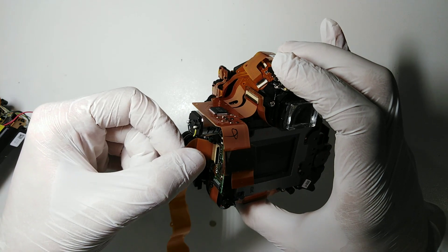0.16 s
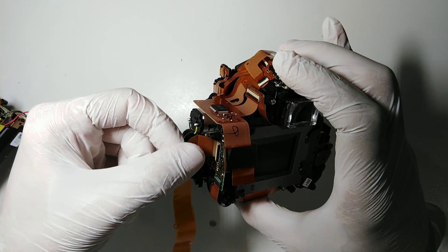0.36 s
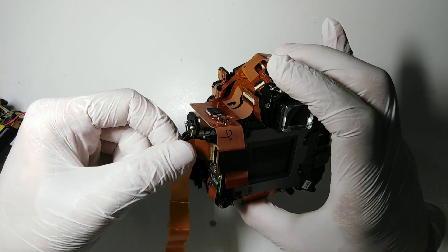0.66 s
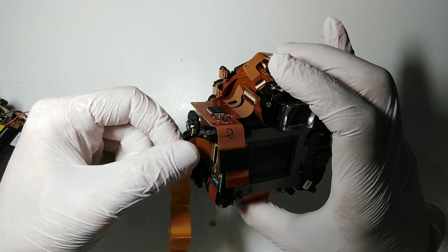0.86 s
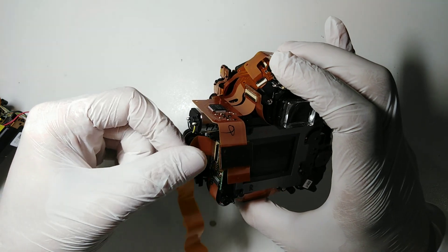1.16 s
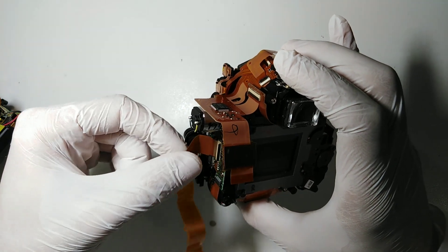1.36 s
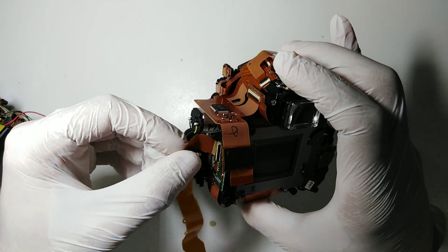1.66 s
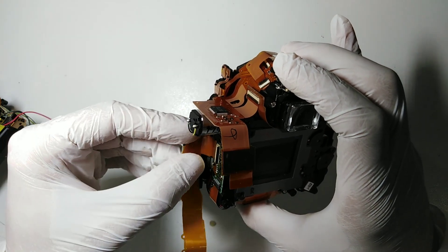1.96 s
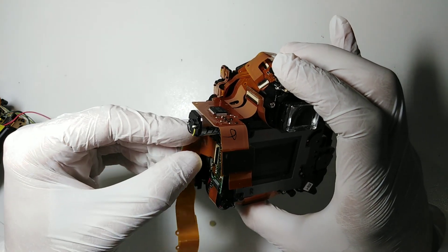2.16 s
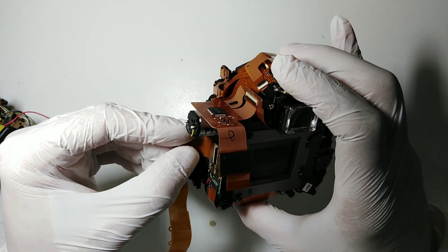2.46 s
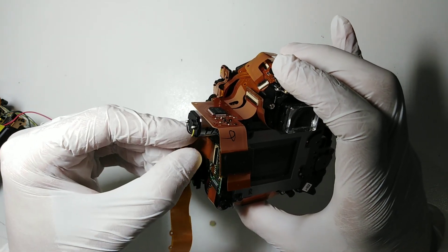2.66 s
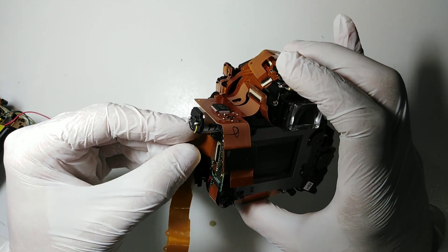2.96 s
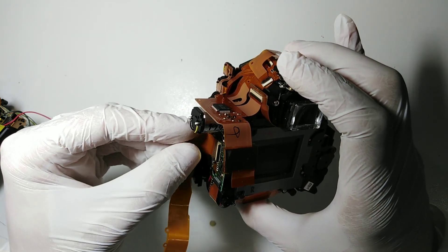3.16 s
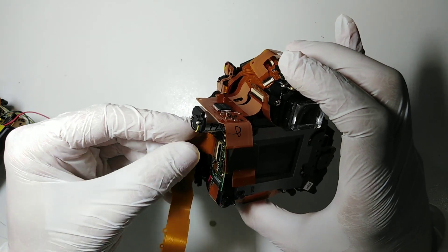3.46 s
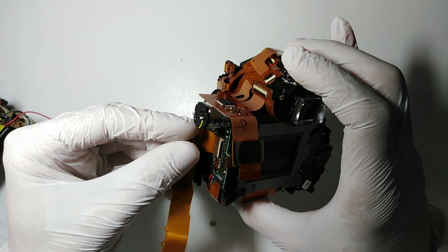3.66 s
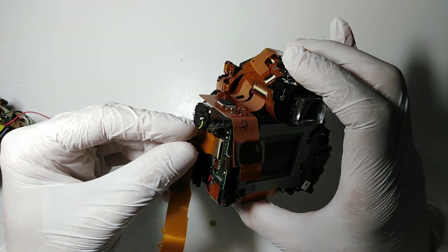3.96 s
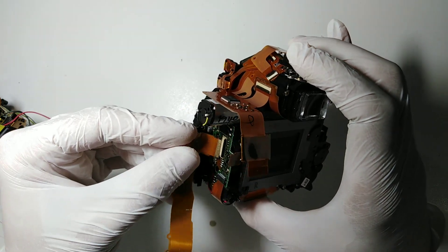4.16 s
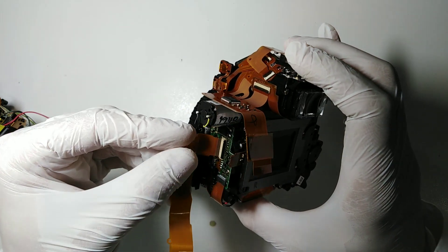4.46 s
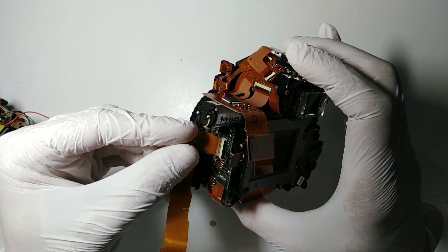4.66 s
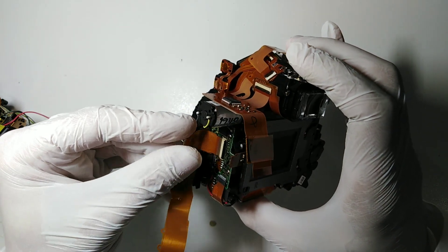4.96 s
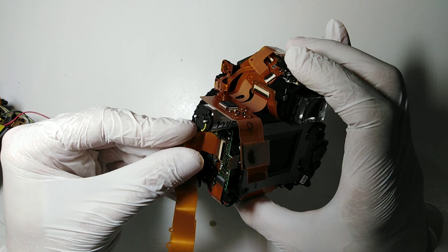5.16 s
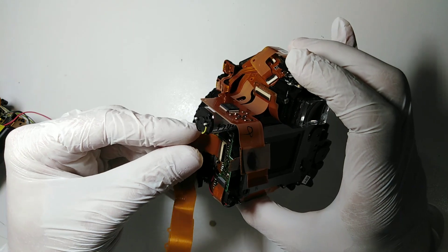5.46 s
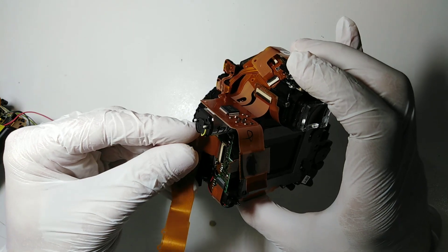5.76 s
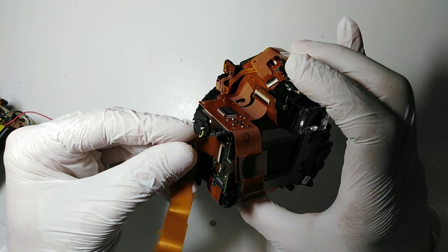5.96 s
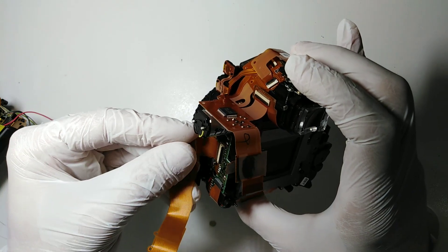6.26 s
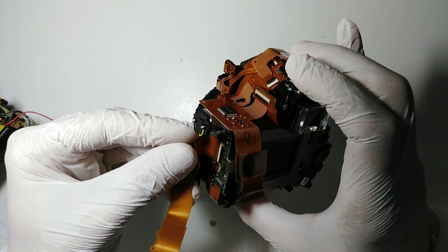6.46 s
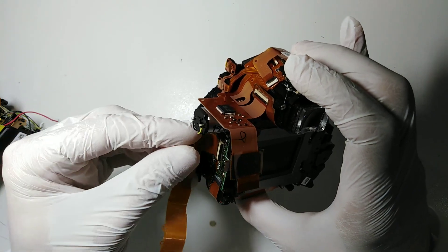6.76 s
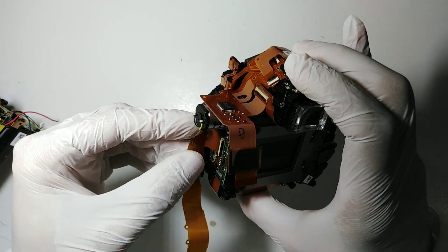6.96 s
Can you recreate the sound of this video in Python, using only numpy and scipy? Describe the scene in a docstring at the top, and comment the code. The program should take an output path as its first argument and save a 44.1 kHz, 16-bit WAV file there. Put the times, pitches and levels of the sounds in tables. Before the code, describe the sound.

Sparse crisp clicks and brief scrapes of stiff plastic film against a small plastic body, over a soft deep room rumble, one loud snap late.

```python
"""A low rumble with a faint hum and dull thumps is heard first, made of noise in low resonances and a sine.
Then gloved fingers bend a stiff flat cable against a small plastic body, right of a microphone pair in a quiet room.
Its film snaps, scrapes and clicks: short noisy slips excite resonances, and sparse decaying taps give the room's
brief answer. A tiny motor pings now and then as narrow noise bands; a suppressor thins all but rumble and hiss."""
import sys
import numpy as np
from scipy import signal
from scipy.fft import rfft, irfft
from scipy.io import wavfile
from scipy.ndimage import uniform_filter1d

SR = 44100
rng = np.random.default_rng(int(sys.argv[2]) if len(sys.argv) > 2 else 0)


def generate_wav(sig):
    """Save sig (samples, or channels by samples) to the path in sys.argv[1] as 16-bit PCM at SR."""
    pcm = np.round(np.clip(np.atleast_2d(sig).T, -1, 1) * 32767).astype(np.int16)
    wavfile.write(sys.argv[1], SR, pcm)


N = 313551


def gain_of(db):
    """Logarithmic level: decibels to amplitude."""
    return 10 ** (np.asarray(db) / 20)


def evened(x):
    """Power normalisation: scales to rms 1."""
    return x / np.sqrt(np.mean(x ** 2) + 1e-20)


def read(points, hz):
    """Logarithmic interpolation: reads a spectrum table on a log-frequency axis."""
    f, value = np.transpose(points)
    return np.interp(np.log(hz + 1), np.log(f + 1), value)


def add(mix, s, sound):
    """Superposition: mixes a sound in at time s, in seconds."""
    part = mix[round(s * SR):][:len(sound)]
    part += sound[:len(part)]


def ring(x, modes):
    """Modal resonance: x excites a sum of steep modes, each a one-pole resonator applied three times."""
    out = np.zeros(x.shape)
    for k, (hz, width_hz, db) in enumerate(modes):
        pole = np.exp((2j * np.pi * hz - np.pi * width_hz) / SR)
        resonance = signal.lfilter([1], np.poly([pole, pole, pole]), x + 0j).real
        steep = (1 - abs(pole)) ** 3 * resonance
        # alternate signs keep neighbours from cancelling
        out += (-1) ** k * gain_of(db) * steep
    return out


def pair(same):
    """Partial coherence: two noises that share a part."""
    a, b = rng.standard_normal((2, N))
    same = np.clip(same, 0, 1)
    return np.array([a, same * a + np.sqrt(1 - same ** 2) * b])


# spectrum of room air and microphone hiss: f/Hz, relative density level/dB
FLOOR_SPECTRUM = [(12, -68), (20, -33), (74, -13.5), (85, 3.5), (106, -4.5), (156, -1), (195, -16),
                  (231, -11), (331, -38.5), (402, -33.5), (531, -32), (702, -33.5), (3420, -41.5),
                  (13400, -43), (15400, -57.5)]
FLOOR_DB = -69


def floor():
    """Stationary noise: steady room air and microphone hiss, nearly unrelated left and right."""
    spectrum = rfft(pair(0.05)) * gain_of(read(FLOOR_SPECTRUM, np.fft.rfftfreq(N, 1 / SR)))
    return gain_of(FLOOR_DB + 0.5) * evened(irfft(spectrum, N))


# deep rumble of building and desk, before waver, thumps and channel gains: t/s, level/dB
RUMBLE_LEVEL = [(0, -68), (0.6, -71.5), (1.0, -62.5), (1.4, -69.5), (1.8, -61), (2.6, -62), (3.2, -67),
                (3.9, -66.5), (4.4, -65.5), (4.6, -75), (5.3, -70.5), (5.9, -76.5), (7.11, -70.5)]
# dull thumps and swells through the desk: peak t/s, fall length/s, then deep, middle and upper level/dB
THUMPS = [(0.261, 0.11, -68, -61.5, -76.5), (0.488, 0.015, -53, -64, -86), (0.756, 0.096, -58, -60.5, -77),
          (0.946, 0.07, -55, -79, -85), (1.16, 0.047, -55.5, -67, -85), (1.381, 0.022, -49.5, -80, -86),
          (1.598, 0.075, -56.5, -71, -75.5), (2.375, 0.04, -71, -68, -52), (3.52, 0.079, -50.5, -59.5, -63),
          (3.622, 0.095, -52.5, -59, -62), (3.987, 0.095, -58.5, -88, -97), (4.414, 0.061, -66, -68, -77),
          (4.838, 0.05, -59, -76.5, -88), (6.34, 0.066, -59.5, -73.5, -77.5),
          (6.861, 0.032, -69, -69.5, -77.5)]
RISE_SHARE = 0.5  # rise time of a thump against its fall
# the higher registers follow the deep level only in part
MIDDLE_DB, UPPER_DB, FOLLOW, WAVER_DB = -74, -83.5, 0.5, 3.5


def registers(t):
    """Amplitude modulation: deep, middle and upper rumble follow a slow drift, a random waver and the thumps."""
    deep_db = np.interp(t, *np.transpose(RUMBLE_LEVEL))
    drift_db = FOLLOW * (deep_db - deep_db.mean())
    base_db = np.array([deep_db, MIDDLE_DB + drift_db, UPPER_DB + drift_db])
    waver_hz = np.geomspace(1.5, 9, num=16)
    waver = evened(sum(np.sin(2 * np.pi * (f * t + rng.random())) for f in waver_hz))
    level = gain_of(base_db + WAVER_DB * waver)
    for s, length, *peaks_db in THUMPS:
        side_length = length * np.where(t < s, RISE_SHARE, 1)
        shape = np.exp(-((t - s) / side_length) ** 2)
        level += gain_of(peaks_db)[:, None] * shape
    return level


# low resonances of room and desk in three registers: f/Hz, pole width/Hz, relative level/dB
DEEP_MODES = [(93.08, 63, 0), (127.7, 40, -5.5)]
MIDDLE_MODES = [(173.7, 28, 0.37), (204.9, 18, -2.4)]
UPPER_MODES = [(247.8, 51, 4), (290, 24, 0), (338.2, 140, -11)]
# rms of the hum before channel gains: t/s, level/dB
HUM_LEVEL = [(0, -67.5), (.7, -75), (1.2, -73), (1.7, -69.5), (2.3, -63), (2.9, -65), (3.4, -63.5),
             (3.7, -63.5), (4.3, -77), (5, -72), (7.11, -74.5)]
HUM_HZ = 110.5


def rumble():
    """Low resonance: noise swells in the modes of room and desk, with a hum of fixed pitch that comes and goes."""
    t = np.arange(N) / SR
    noise = pair(0.6)
    layers = zip(registers(t), (DEEP_MODES, MIDDLE_MODES, UPPER_MODES))
    out = sum(level * evened(ring(noise, modes)) for level, modes in layers)
    hum_rms = gain_of(np.interp(t, *np.transpose(HUM_LEVEL)))
    hum = np.sqrt(2) * hum_rms * np.sin(2 * np.pi * HUM_HZ * t)
    # the microphones lose the deepest bass
    out = signal.sosfilt(signal.butter(2, 45, "high", fs=SR, output="sos"), out)
    return (out + hum) * gain_of([[-1.5], [1.2]])


# pings of the tiny motor beside the microphones: t/s, peak level/dB before channel gains, f/Hz
PINGS = [(0.4304, -68.5, 11530), (0.4684, -77, 11500), (0.5166, -75, 11500), (0.5994, -69, 12360),
         (0.6784, -78, 10720), (3.384, -68.5, 11760), (3.415, -66, 11800), (3.4848, -73, 10450),
         (3.5167, -69, 12330), (3.5498, -74, 11400), (3.584, -67, 11380), (3.6177, -72, 11500),
         (3.683, -73.5, 11700), (3.8162, -74, 11900), (4.8314, -77, 12400), (6.5151, -64, 12200),
         (6.549, -74, 12500), (6.5819, -73, 12400), (6.6155, -67.5, 11500), (6.6494, -76, 12350),
         (6.6837, -73.5, 10800), (6.7506, -77, 11700), (6.7825, -76, 11800), (6.9177, -70, 11400),
         (6.9494, -73, 12000), (6.9845, -74, 10200), (7.017, -69.5, 10600), (7.0517, -67, 10820)]
PING_WIDTH_HZ, PING_DECAY_S = 300, 0.015
# the same motor holds a thin note once
WHINE_START_S, WHINE_END_S, WHINE_DB, WHINE_HZ = 4.73, 5.15, -89.5, 10130


def pings():
    """Narrow-band resonance: short thin pings and one held whine, very high and mostly on the right."""
    out, t = np.zeros(N), np.arange(2600) / SR
    for (s, db, hz), noise in zip(PINGS, rng.standard_normal((len(PINGS), len(t)))):
        ping = ring(noise, [(hz, PING_WIDTH_HZ, 0)]) * np.exp(-t / PING_DECAY_S)
        add(out, s, gain_of(db) * ping / abs(ping).max())
    held = rng.standard_normal(round((WHINE_END_S - WHINE_START_S) * SR))
    whine = evened(ring(held, [(WHINE_HZ, 120, 0)]))
    add(out, WHINE_START_S, gain_of(WHINE_DB) * whine)
    return out * gain_of([[-10], [5]])


# late decay of the room: f/Hz, t60/s
ROOM_DECAY = [(700, 0.66), (2000, 0.44), (5000, 0.42), (9000, .42), (14000, 0.33)]


def tail():
    """Reverberant decay: sparse taps of random sign from 1.5 ms on, each band dying at its own speed."""
    taps, spacing = np.zeros((2, SR // 2)), 12  # mean spacing in samples
    at = np.arange(64, SR // 2 - spacing, spacing)
    at = at + rng.integers(0, spacing, (2, len(at)))
    np.put_along_axis(taps, at, rng.choice([-1., 1.], at.shape), 1)
    hz, t, bands = signal.stft(taps, SR, nperseg=128)
    # the desk and hands throw back the first echoes strongly
    early = 1 + 4.5 * np.exp(-t / .012) + 0.8 * np.exp(-t / .05)
    decay = gain_of(-60 * t / read(ROOM_DECAY, hz)[:, None])
    out = signal.istft(bands * early * decay, SR, nperseg=128)[1]
    return out / np.linalg.norm(out[0])


def room(x):
    """Time-varying reverberation: two tails are fed in turn, as the hands keep changing the paths."""
    turn = 2 * np.pi * 1.3 * np.arange(N) / SR
    shares = np.sin(turn), np.cos(turn)
    return sum(signal.fftconvolve(x * share, tail(), axes=1)[:, :N] for share in shares)


# threshold of the suppressor: f/Hz, level/dB
THRESHOLD = [(500, -86.5), (2000, -89.5), (4000, -92.5), (8000, -95.5), (14000, -95)]


def suppress(x, release_db_per_s):
    """Spectral gating: each channel's bands open above a threshold and shut as the remembered level sinks."""
    hz, t, bands = signal.stft(x, SR, nperseg=512, noverlap=384)
    power = uniform_filter1d(abs(bands) ** 2, size=3, axis=1)
    power = uniform_filter1d(power, size=7, axis=2)
    power_db = 10 * np.log10(abs(power) + 1e-20)
    # running maximum against a falling line; weak sounds keep only their strongest bands
    released_db = release_db_per_s * t
    held_db = np.maximum.accumulate(power_db + released_db, axis=2) - released_db
    shut = gain_of(3 * (read(THRESHOLD, hz)[:, None] - held_db))
    return signal.istft(bands / (1 + shut), nperseg=512, noverlap=384)[1][:, :N]


def scrapes(strokes, modes):
    """Stick-slip friction: dense uneven micro-slips through the given rings."""
    t, level = np.arange(N) / SR, np.zeros(N)
    for rows in strokes:
        s, db = np.transpose(rows)
        level += gain_of(np.interp(t, s, db, -140, -140))
    # about 3000 slips a second, of uneven strength
    strength = rng.standard_normal(N) * gain_of(3.5 * np.minimum(rng.exponential(1, N), 5))
    slips = strength * (rng.random(N) < 3000 / SR)
    return gain_of(6.0) * uniform_filter1d(level, size=128) * evened(ring(slips, modes))


# the glove drags over the film, one list a stroke: t/s, relative level/dB
SCRAPES = [
    [(1.6, -93), (1.64, -54.5), (1.694, -76.5), (1.734, -68), (1.74, -43.5)],
    [(1.9, -76.5), (1.906, -51), (1.922, -51), (1.924, -38)],
]
# rings of the scraped film: f/Hz, pole width/Hz, relative level/dB
SCRAPE_TONE = [(3560, 1200, -5.5), (4700, 1200, -4), (5900, 4300, 0.5), (7940, 3500, -0.5),
               (9800, 4300, -4.5), (12000, 5100, -8)]
# a loose piece buzzes in the body while the cable is pulled, one list a pull: t/s, relative level/dB
BUZZES = [
    [(2.49, -88.5), (2.51, -73.5), (2.52, -67), (2.614, -93), (2.638, -76), (2.712, -78), (2.74, -83),
     (2.8, -101)],
    [(5.21, -95), (5.228, -85), (5.272, -82), (5.3, -80), (5.38, -99)],
]
# rings of the buzzing piece: f/Hz, pole width/Hz, relative level/dB
BUZZ_TONE = [(1180, 36, 0), (2170, 90, -10), (3464, 150, -11.5)]


def drags():
    """Friction-driven resonance: the glove's strokes over the film and the buzz of a loose piece."""
    return scrapes(SCRAPES, SCRAPE_TONE) + scrapes(BUZZES, BUZZ_TONE)


# lower and upper modes of the plastic body, before damping and striking place:
# f/Hz, pole width/Hz, relative level/dB
BODY = [(680, 180, -3), (1162, 200, -0.5)]
UPPER_BODY = [(1635, 250, -4.5), (2277, 540, 2)]
# sizzle modes of the film: f/Hz, pole width/Hz, relative level/dB
SIZZLE = [(10700, 2700, -1.5), (12770, 2700, 4.5)]
# loose parts that ring longer: f/Hz, pole width/Hz, relative level/dB before the tuning to the rings
SMALL_PARTS = [(2250, 290, -7.5), (3500, 160, -0.5), (4280, 350, -5), (4587, 510, -2.5), (5720, 210, 0.5),
               (6470, 510, -2.5), (7500, 89, -1)]
# snaps hidden from the left microphone by the hand are slower slips and ring longer
SLIP_MS, SLIP_MS_PER_DB, RING_MS, RING_MS_PER_DB = 0.4, 0.0237, 0.38, 0.013
# weak ticks ring longer and purer: less widening of rings in the echo
RING_MS_PER_WEAK_DB, SPREAD, SPREAD_PER_DB = 0.008, 2.1, 0.14
PLACE_DB_PER_OCTAVE = 19  # body modes far from the struck region answer less
DAMPING_PER_DB = 0.035  # hard snaps ring the gripped body more bluntly
NEAR_DB_PER_OCTAVE = 25  # parts tuned near a ring answer most
PARTS_DB, PARTS_SLOPE = -20.5, 0.19  # loose parts stand out more in weak snaps
FILM_EDGE_HZ = 2600  # the thin film radiates little below this
SCATTER_S = 0.004  # spread of the first paths to the walls


def struck(modes, db, place_hz):
    """Modal excitation: body modes widen with strength and weaken away from the struck pitch region."""
    damping = np.exp(DAMPING_PER_DB * (db + 46))
    return [(f, w * damping, d - PLACE_DB_PER_OCTAVE * abs(np.log2(f / place_hz))) for f, w, d in modes]


def snap(row, noise):
    """Impulsive excitation: a short rough slip rings film, body and loose parts; gives direct sound and room feed."""
    db, upper_hz, lower_hz, place_hz, lower_db, low_db, high_db, sizzle_db, echo_db, pan_db = row
    slip_ms = max(SLIP_MS - SLIP_MS_PER_DB * pan_db, .05)
    ring_ms = RING_MS - RING_MS_PER_DB * pan_db - RING_MS_PER_WEAK_DB * (db + 39.5)
    width_hz = 1000 / max(ring_ms, .2)
    wide = max(SPREAD + SPREAD_PER_DB * (db + 40), 1)
    loose = []
    for f, w, d in SMALL_PARTS:
        octaves = min(abs(np.log2(f / lower_hz)), abs(np.log2(f / upper_hz)))
        loose.append((f, w, d - NEAR_DB_PER_OCTAVE * octaves))
    t = np.arange(len(noise)) / SR
    slip_time = t * 1000 / slip_ms
    slip = noise * slip_time * np.exp(-slip_time)
    # modes, relative level in dB, widening in the echo, lower edge of radiation in Hz
    parts = [(struck(BODY, db, place_hz), low_db, wide, 300),
             (struck(UPPER_BODY, db, place_hz), high_db, wide, 300),
             ([(lower_hz, 0.64 * width_hz, 0)], lower_db, wide, FILM_EDGE_HZ),
             ([(upper_hz, width_hz, 0)], 0, wide, FILM_EDGE_HZ),
             (SIZZLE, sizzle_db, SPREAD, FILM_EDGE_HZ),
             (loose, PARTS_DB - PARTS_SLOPE * db, 1, 300)]
    direct, feed = np.zeros((2, len(t)))
    for k, (modes, rel_db, spread, edge_hz) in enumerate(parts):
        thin = signal.butter(2, edge_hz, "high", fs=SR)
        x = signal.lfilter(*thin, ring(slip, modes))
        x *= gain_of(db + rel_db) / abs(x).max()
        direct += (-1) ** k * x
        # summed over all directions the rings are broader and smoother, and reach the walls by scattered paths
        knock = noise[::-1][np.arange(len(t)) - 300 * k] * np.exp(-t / SCATTER_S)
        blunt = signal.lfilter(*thin, ring(knock, [(f, spread * w, d) for f, w, d in modes]))
        feed += blunt * np.linalg.norm(x) / np.linalg.norm(blunt)
    return direct, gain_of(echo_db) * feed


# snaps of the film, before channel gains: t/s, peak level/dB of the upper ring, upper ring f/Hz,
# lower ring f/Hz, pitch region struck on the body f/Hz, then relative level/dB of
# lower ring, body, upper body, sizzle and echo, and last the left-channel offset level/dB
SNAPS = [(0.249, -80, 5680, 3450, 2000, -5, -14, -2.5, -13, 11, 10),
         (0.7396, -31.5, 7150, 3930, 1600, 3, -23.5, -13.5, -2.5, 4, -4.5),
         (0.7671, -46.5, 5140, 3480, 2000, -7.5, -28, -13.5, -11, 9, 4),
         (0.7836, -48.5, 5600, 4260, 2000, -5, -26.5, -11, -3.5, 3.5, -17),
         (0.9244, -58, 8130, 4180, 1100, -0.5, -18.5, -19.5, -23, 8, -2.5),
         (1.0129, -70.5, 8150, 3880, 2000, 2, -16, -18.5, -16, 9.5, 0.5),
         (1.0841, -40.5, 6830, 4170, 2300, -6.5, -40.5, -34, -5.5, 5.5, -6.5),
         (1.2445, -66, 6470, 3980, 2000, -36.5, -39, -36.5, -38, 10.5, -22.5),
         (1.741, -40, 5630, 3430, 1600, -3.5, -59, -18.5, -21, 5.5, -2.5),
         (1.907, -55.5, 9050, 3400, 1400, -1, -12, -28.5, -3, 13, -15.5),
         (1.9286, -20, 7180, 4390, 750, 0.5, -26, -29.5, -11.5, 3, 0),
         (2.0449, -38.5, 6950, 3940, 2000, 2.5, -23.5, -12, -15, 6, -9),
         (2.0711, -45, 6160, 4430, 2000, -3, -19.5, -11, -5.5, 3.5, -6),
         (2.205, -58, 6630, 4350, 1500, -10, -33, -14, -11.5, 0.5, -29),
         (2.3426, -45, 6990, 3880, 1900, -8, -39, -17.5, -20, 5, -13.5),
         (2.5192, -27, 6770, 5440, 1000, -18, -28, -27, -12.5, 1, 0.5),
         (2.5319, -40.5, 5810, 4060, 2000, -7, -21, -39, -2, 7, 1.5),
         (2.5505, -45, 5630, 4750, 2000, -7, -44.5, -23, -30, 8.5, -7.5),
         (2.6364, -45.5, 6470, 3730, 1400, -6.5, -15.5, -48.5, -8, -2, 1.5),
         (2.6713, -51, 7600, 4000, 2000, -6.5, -15, -37, -12, 2.5, -11),
         (2.706, -59, 7720, 4030, 2200, -12, -35, -14, -4, 9.5, -8),
         (2.7279, -33.5, 8000, 4300, 2300, -5, -52, -22, -16, 3, 3.5),
         (3.042, -54, 6970, 3830, 2300, -14, -34, -16, -47, 7, -8.5),
         (3.701, -61, 7000, 3740, 900, 4, -18.5, -37, -11, 6.5, -11),
         (3.7397, -55.5, 6710, 4070, 700, -5.5, -27, -47.5, -37, 5, -23),
         (3.896, -68.5, 5830, 4000, 2200, -10, -36, -27.5, -32.5, 8, -18),
         (3.9074, -62.5, 6800, 3480, 700, -17, -24, -34, -35, 4.5, -13),
         (3.935, -57, 7520, 3800, 2190, -8.5, -32, -22.5, -43, 5.5, -26),
         (3.9747, -63, 7030, 3810, 2300, -0.5, -24, -15, -35.5, 8, -23),
         (4.1306, -62, 7760, 4100, 2200, -9, -38, -15, -43, -10.5, -35),
         (4.1458, -51.5, 7530, 4100, 2200, -8.5, -38, -28, -16, 7.5, -31),
         (4.1556, -54.5, 7020, 4140, 2300, -8.5, -50, -10, -35, 5.5, -25.5),
         (4.2799, -33, 6890, 4400, 2300, -4, -43, -23.5, -14, 5, -6.5),
         (4.3191, -31.5, 6860, 4200, 2000, -0.5, -33, -31, -10, 5, 7),
         (4.3259, -33.5, 6380, 3770, 1900, 1, -21, -16, -3, 6.5, -5),
         (4.342, -47, 6100, 4400, 900, -5, -16, -2, -4, 7, 0),
         (4.38, -28.5, 6970, 4260, 1800, -4, -27.5, -19, -3, 3, 4.5),
         (4.6909, -87.5, 7600, 4360, 1400, 12.5, 2, 8, -24, 7.5, -12.5),
         (5.1493, -74.5, 6880, 4092, 2300, -4, -31, -29, 3, 15, -18),
         (5.223, -59, 7430, 3570, 2180, 2.5, -12, -10, -9.5, 7, -14.5),
         (5.237, -68, 6600, 3610, 2200, 3.5, -22, -9, -20.5, 0, -17.5),
         (5.2482, -65.5, 6400, 3730, 2000, -9, -16, -10.5, -22, 7, -3),
         (5.2948, -63.5, 7260, 3580, 2210, 0.5, -12, -13.5, -23.5, 9, -11),
         (5.336, -76.5, 6500, 3550, 2200, 5.5, -11, -7, -25, 9, -19),
         (5.469, -65.5, 7720, 4640, 1600, -25, -38.5, -48, -3, 6.5, -32.5),
         (6.3286, -15, 6183, 4086, 1000, -4, -41, -30, -6, -1, -3.6),
         (6.7774, -79.5, 5670, 4010, 2300, -5, -24, -2, -12, 9, -17),
         (6.879, -48, 7710, 3520, 2200, -15, -60, -32, -11, 6.5, -8.5),
         (7.0764, -68.5, 5900, 5200, 1600, -16, -36, -31, -11, 12.5, -16)]
ECHO_PAN_SHARE = 0.24  # snaps hidden from the left microphone echo more to the right


def cable():
    """Shadowing and reverberation: snaps and scrapes with echoes, the far left weaker, duller and later."""
    out, feeds = np.zeros((2, 2, N))
    for (s, *row), noise in zip(SNAPS, rng.standard_normal((len(SNAPS), 2048))):
        direct, feed = snap(row, noise)
        pan_db = row[-1]
        add(out[0], s + 0.000898, gain_of(1.5 + pan_db) * direct)
        add(out[1], s + 0.0006, gain_of(11.5) * direct)
        add(feeds[0], s + .0007, gain_of(ECHO_PAN_SHARE * pan_db) * feed)
        add(feeds[1], s + 0.00077, feed)
    drag = drags()
    out += drag * gain_of([[-17], [0]])
    out += room(feeds + drag * gain_of([[-16], [-8]]))
    out[0] = signal.lfilter(*signal.butter(1, 6500, fs=SR), out[0])  # the hands dull the left
    return signal.lfilter(*signal.butter(3, 450, "high", fs=SR), out)


def scene():
    """Superposition: gated snaps, echoes and pings over the ungated low background."""
    return suppress(cable() + pings(), release_db_per_s=198.5) + rumble() + floor()


EDGE_HZ = 15500


def record(dry):
    """Band limitation: the treble above about 14.4 kHz is much weakened, then cut off at the upper edge."""
    low_pass = signal.firwin(255, 14400, window=("kaiser", 6), fs=SR)
    below = signal.oaconvolve(dry, low_pass[None], "same")
    dulled = below + gain_of(-26.0) * (dry - below)
    band_limit = signal.firwin(511, EDGE_HZ, window=("kaiser", 9), fs=SR)
    return signal.oaconvolve(dulled, band_limit[None], "same")


dry = scene()
out = record(dry)
generate_wav(out)
```